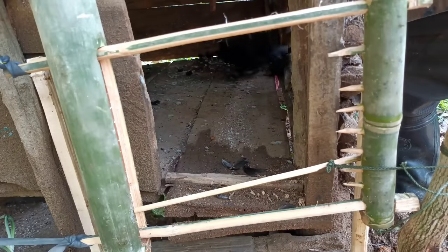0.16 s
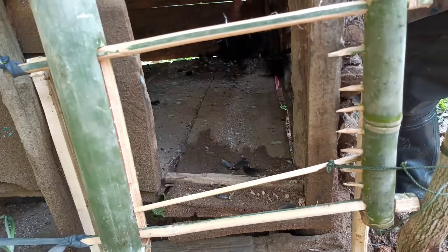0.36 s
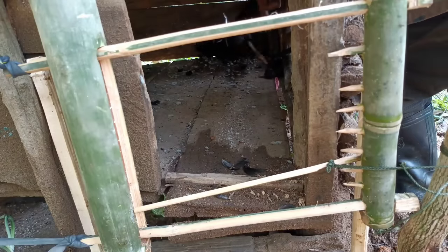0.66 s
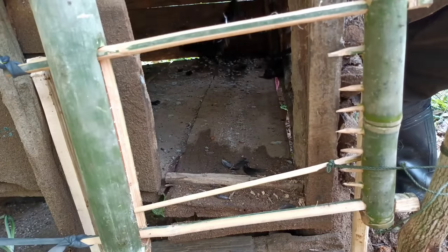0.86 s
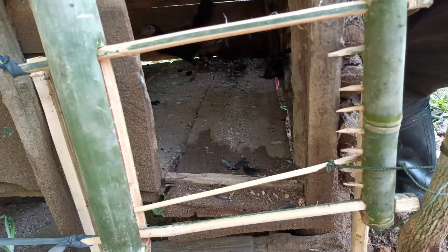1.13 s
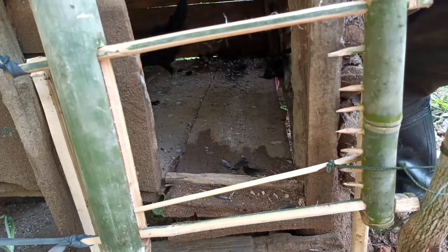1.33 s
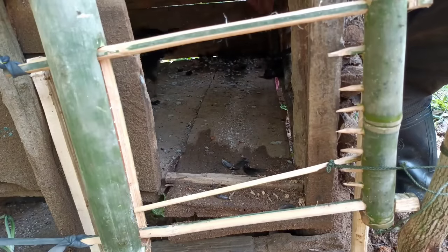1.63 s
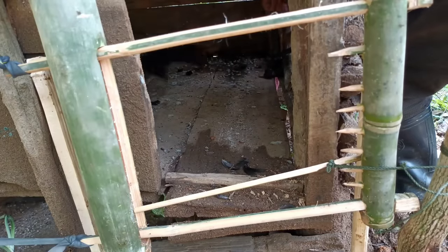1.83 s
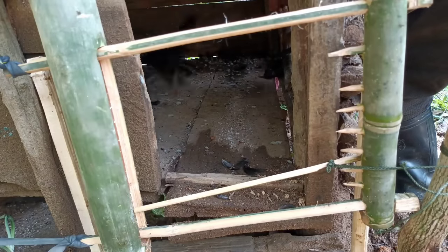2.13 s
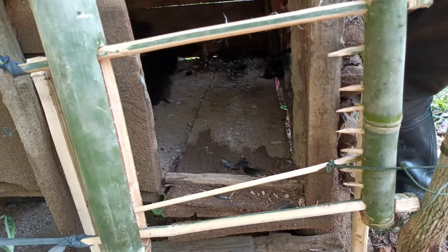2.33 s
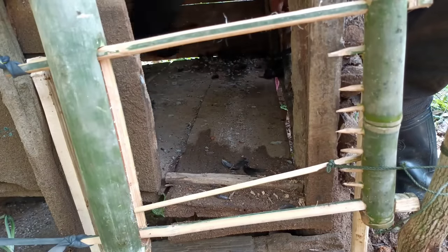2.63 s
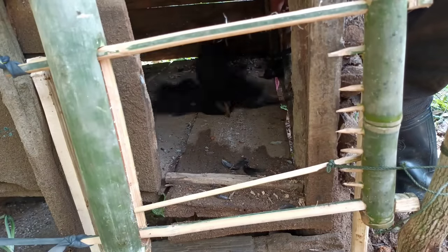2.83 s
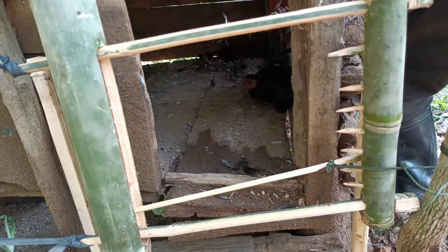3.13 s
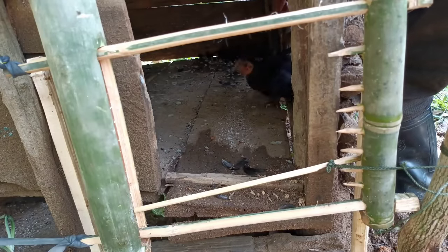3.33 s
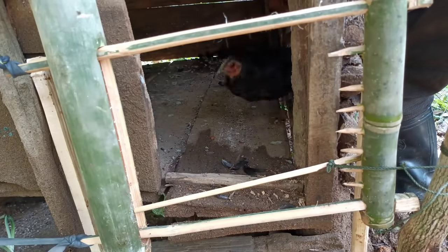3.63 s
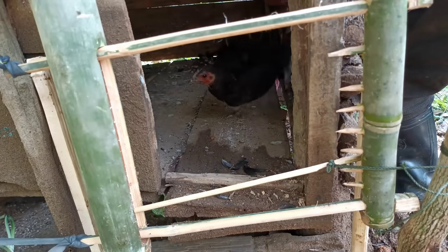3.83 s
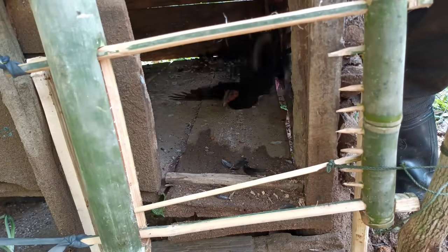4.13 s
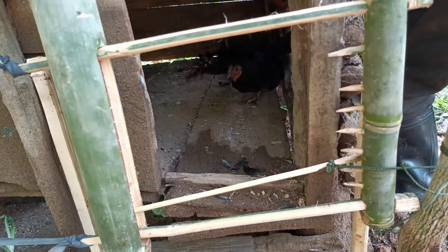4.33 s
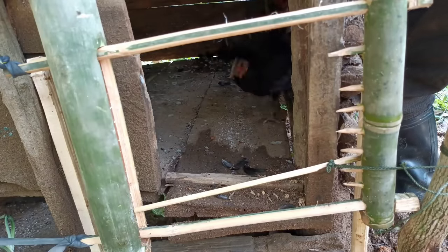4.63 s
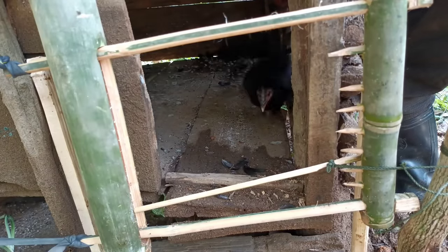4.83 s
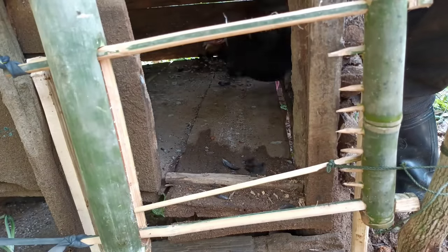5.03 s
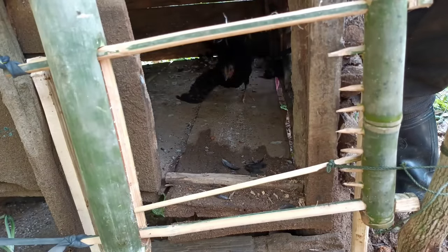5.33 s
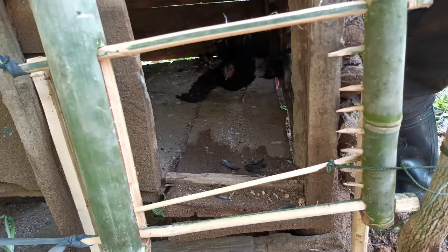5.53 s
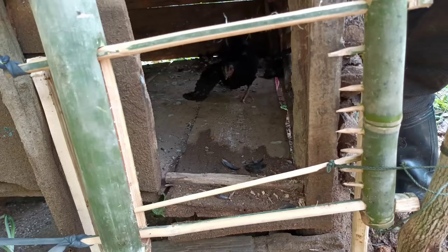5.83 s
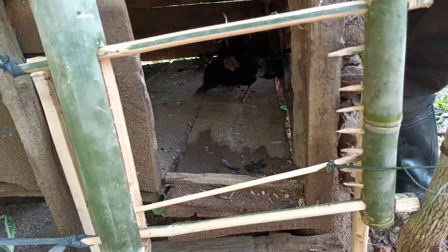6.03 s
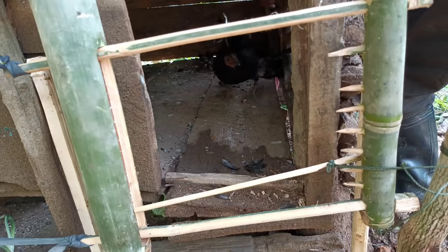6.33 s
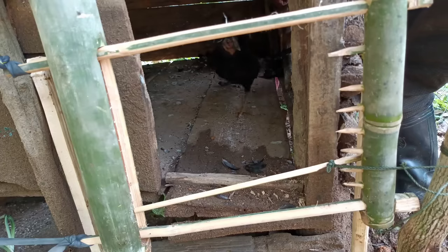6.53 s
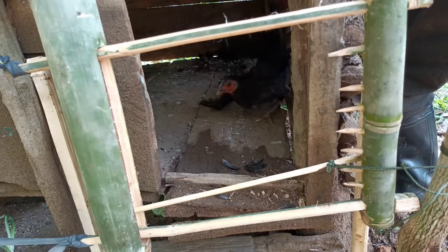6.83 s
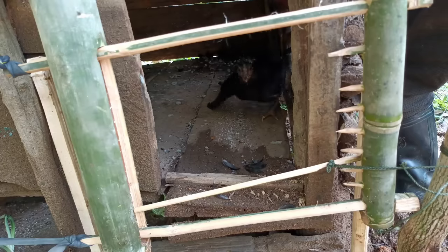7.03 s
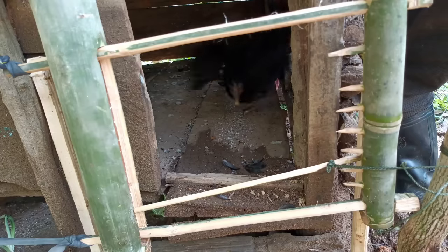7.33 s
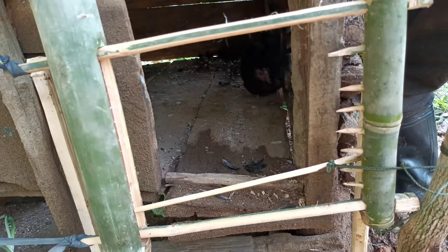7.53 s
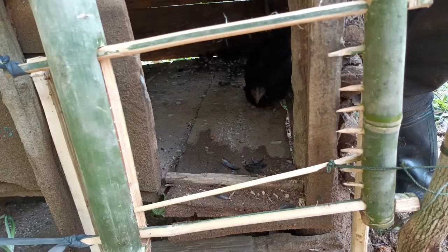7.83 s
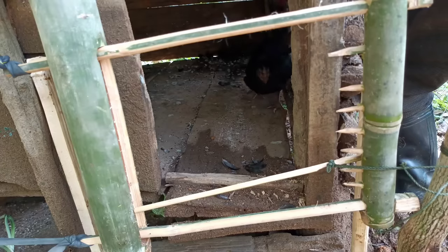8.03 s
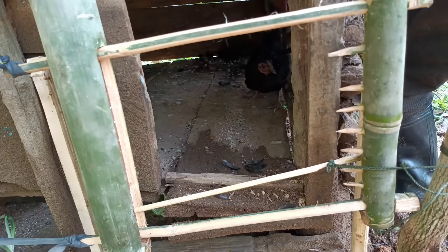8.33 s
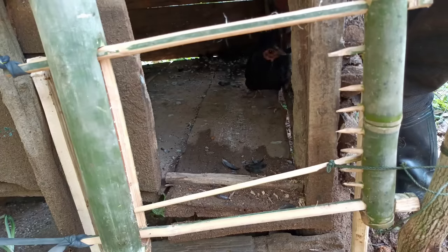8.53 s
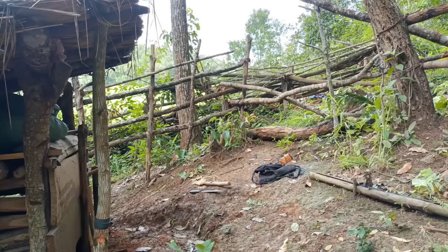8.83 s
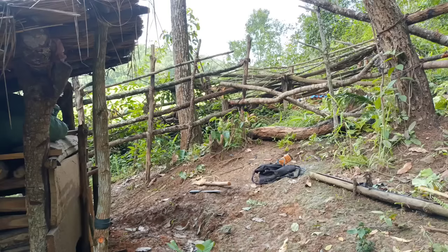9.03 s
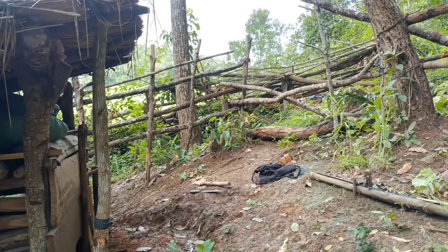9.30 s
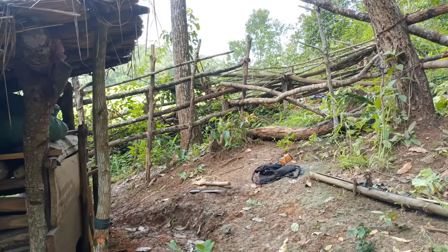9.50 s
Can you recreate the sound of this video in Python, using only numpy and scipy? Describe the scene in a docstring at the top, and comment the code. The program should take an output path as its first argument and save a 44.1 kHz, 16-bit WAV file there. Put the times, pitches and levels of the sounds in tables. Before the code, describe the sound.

Light footfalls on hollow boards come first, over soft low air and a faint insect hiss. A bird flaps, clucks, peeps and lands with a thump, then gives shrill two-toned squawks that swell, crack and collapse into hoarse rasps, some alone and two close together. After a quick fade and momentary silence, an open yard brings a thin, high insect drone and a dry wooden clack. The microphone is near the coop, in stereo.

```python
"""Shrill two-voiced squawks fall and break into a rasp, among peeps, low clucks, knocking feet and wings.
A young chicken is scrambling about a small plank coop; then the sound fades out and opens on a yard
where insects drone and a piece of wood clacks. The voice is a pair of whistles that collapse into pulses;
feet and wood are dying modes with bursts of noise; feathers, wings, air and insects are shaped noise."""
import sys
import numpy as np
from scipy import signal
from scipy.fft import rfft, irfft, next_fast_len
from scipy.io import wavfile
from scipy.ndimage import map_coordinates

SR = 44100
rng = np.random.default_rng(int(sys.argv[2]) if len(sys.argv) > 2 else 0)


def wav_record(signal):
    """Record a signal, one row per channel, as 16-bit PCM in the file named by sys.argv[1]."""
    frames = np.transpose(np.atleast_2d(signal))
    bounded = np.clip(frames, -1, 1)
    # unit amplitude maps onto the largest positive 16-bit level
    quanta = np.round(bounded * 32767).astype(np.int16)
    wavfile.write(sys.argv[1], SR, quanta)


N = 426006
T = np.arange(N) / SR

# Short peeps and chirps. Each row: start in seconds, length in seconds, mid pitch in Hz, glide in Hz per second,
# arch as a share of the pitch, peak level in dB before the voice trim, roughness 0-1.
PEEPS = [(0, 0.083, 4274, -3200, .02, -44.5, 0.42), (1.515, .068, 1850, 2000, 0.4, -54, 0),
         (2.291, 0.065, 3300, -7000, 0.024, -45.5, 0.18), (2.522, 0.061, 4025, -19000, 0.021, -36.5, 0.14),
         (2.688, .09, 4163, -4500, 0.055, -28.5, .06), (3.705, .048, 2593, 4, 0.099, -51.5, 0.65),
         (4.108, 0.034, 4054, 39995, .09, -30.5, 0.2), (6.566, 0.072, 4050, -15000, .22, -40.5, 0.24)]
PEEP_LEAN, PEEP_ENDS_DB, PEEP_SECOND = 0.56, -11, .1  # peaks early, soft at both ends, weak second voice
# Lines in the whistle. Each row: multiple of the first voice, multiple of the second, level in dB
# before the two voices' balance weighs it.
PARTIALS = [(2, 0, -9.5), (3, 0, -26.5), (1, 1, -25), (0, 2, -20), (0, 3, -31.5), (2, -1, -16.5),
            (3, -1, -21), (.5, 0, -24), (0, .5, -20.5)]
# The whistle's spectrum: thin near 6.4 kHz, strong around 7.7 and 9.1 kHz.
# Each row: frequency in Hz, relative level in dB.
WHISTLE_COLOUR = [(1800, -5), (2500, 6.5), (5200, 2), (6400, -12.5), (7700, 6.5), (8500, -4.5), (9100, 6),
                  (10200, 4)]
# The rasp's spectrum before the throat. Each row: frequency in Hz, relative level in dB.
RASP = [(250, -20.5), (480, -7), (800, -1), (1150, -6.5), (1700, -0.5), (4000, 0.5), (6500, -7),
        (8500, -8.5), (11000, -12), (15000, -27.5)]
# The far wash heard in the coop. Each row: frequency in Hz, relative level in dB per Hz.
COOP_AIR, COOP_AIR_DB = [(15, -31.5), (25, 1), (152, -6), (193, -7), (378, -13), (410, -10.5), (523, -13.5),
                         (895, -17), (2920, -17.5), (3830, -15), (5280, -22), (15500, -32)], -63.5
# Slow swell of the wash and drone in the coop. Each row: time in seconds, gain in dB.
AIR_SWELL = [(0, 3), (1.2, 2), (3.3, 2.5), (5.6, 0.5)]
# How alike the wash is left and right. Each row: frequency in Hz, likeness as a share (1 is identical).
SAME = [(30, 0.054), (130, 0.49), (600, 0.66), (1400, 0), (3000, 0)]
# Standing waves in the coop. Each row: frequency in Hz, width in Hz, level in dB.
HOLLOW = [(150, 35, -2.5), (817, 290, -9), (1679, 120, -11), (2720, 19, -20.5)]
# Decay of the coop's tail. Each row: frequency in Hz, time to fall 60 dB in seconds.
COOP_T60 = [(400, 0.23), (1500, 0.11), (12000, 0.27)]
# Feathers brushing the planks. Each row: middle in seconds, half length in seconds, peak level in dB.
BRUSHES = [(0.04, 0.24, -60), (1.74, 0.22, -67.5), (1.884, 0.01, -55), (1.957, 0.02, -45),
           (2.259, 0.014, -43), (2.53, 0.11, -54), (2.849, 0.017, -42), (3.02, 0.16, -57.5),
           (3.223, 0.006, -49), (4.319, 0.072, -54), (5.093, 0.0089, -37), (5.129, 0.015, -33.5),
           (7.833, 0.028, -53.5)]
# Colour of the brushing. Each row: frequency in Hz, relative level in dB.
FEATHERS = [(200, -7), (700, 0), (2000, 0), (4000, 1), (6000, -3), (8500, -2), (11000, -12), (15000, -12)]
# Spells of shuffling feet. Each row: middle in seconds, half length in seconds, peak level in dB.
SHUFFLES = [(.1, 0.19, -60), (0.723, 0.12, -61.5), (1.672, 0.13, -61.5), (2.66, 0.61, -56.5),
            (4.095, 0.14, -57.5), (5.043, 0.15, -53)]
# Modes of the boards. Each row: frequency in Hz, relative level in dB.
BOARDS = [(410, -8), (520, -7.5), (650, -3), (800, -8), (953, -2), (1150, -5.5), (1460, -15)]
# Feet on the boards. Each row: time in seconds, knock in dB and claw in dB, both before the mix of their parts.
STEPS = [(0.044, -34, -51), (0.086, -37.5, -62), (0.198, -39.5, -71), (0.684, -48, -68), (0.765, -42, -56),
         (0.828, -44.5, -61), (1.077, -37.5, -84), (1.361, -35, -50), (1.602, -40, -51.5),
         (1.945, -38, -38), (2.082, -36.5, -46), (2.246, -49, -37), (2.352, -34.5, -45),
         (2.426, -34.5, -30), (2.471, -33.5, -61), (2.509, -39.5, -51), (2.523, -27, -43),
         (2.762, -40, -30), (2.781, -38.5, -36.5), (2.944, -23.5, -27.5), (3.09, -37, -45),
         (3.246, -39.5, -51), (3.365, -45, -51), (3.632, -37.5, -59), (4.207, -36.5, -58),
         (4.698, -45, -56), (4.918, -40, -33.5), (5.025, -31.5, -20.5), (6.808, -43.5, -61),
         (7.42, -38, -51), (7.665, -51, -51), (7.898, -44, -61), (8.026, -56.5, -61)]
# The whole floor flexing. Each row: frequency in Hz, relative level in dB.
FLOOR = [(100, 0), (155, -5.5), (265, 3.5), (370, 3.5)]
LANDING_S, LANDING_DB = 2.946, -22  # the bird comes down with its whole weight
# Bouts of wingbeats. Each row: first beat in seconds, end in seconds, beats per second, peak level in dB.
FLURRIES = [(2.296, 3.0, 7.1, -52.5), (5.0, 5.15, 10.2, -47.5)]
# Colour of the wing gusts. Each row: frequency in Hz, relative level in dB.
PUSH = [(35, 5), (150, 0), (280, -5), (1000, -32.5), (4000, -82.5)]
# Low clucks. Each row: start in seconds, length in seconds, pitch in Hz, level in dB.
CLUCKS = [(2.384, 0.024, 437, -57), (2.607, 0.016, 469, -50), (2.685, 0.038, 474, -45),
          (2.772, 0.031, 506, -43), (2.874, 0.031, 405, -44.5), (5.06, 0.022, 503, -44),
          (5.178, 0.023, 477, -48.5)]
# Full squawks. Each row: start in seconds, whistle length in seconds, pitch in Hz, scoop as a share of the pitch,
# glide in Hz per second, drop time in seconds, opening level in dB and full level in dB before the voice trim,
# swell time in seconds, crack time in seconds after the start, second voice before the crack 0-1,
# second voice after it 0-1, roughness 0-1, rasp length in seconds, throat pitch of the rasp in Hz before it sags,
# rasp amount 0-1.
SQUAWKS = [(4.122, .134, 4737, .25, -1000, .033, -42.5, -22.5, 0.098, .076, .92, 0.04, .02, 0.027, 1850, 0.57),
           (4.88, 0.12, 4560, .25, 900, .009, -23, -18.5, 0.11, 0.061, 0, 0, 0.02, 0.059, 3056, 0.34),
           (5.152, .119, 4900, 0, -1, .017, -36, -21, 0.13, 0.035, .3, 0.25, .15, 0.057, 1849, 0.82),
           (6.772, 0.16, 4488, .1, -2000, .014, -48, -22, 0.12, .118, .33, 0.1, 0, 0.04, 1907, .85),
           (7.327, 0.2, 4058, .27, 3201.5, .035, -37.5, -21.5, 0.092, 0.083, .4, 0.54, 0.01, .055, 1920, 1)]
SCOOP_S = .011  # a squawk slides up to its pitch
SWELL_POWER = 1.3  # the swell starts slowly
CATCH, CATCH_S, CATCH_DB = .4, .005, -12  # the voice catches, hoarse and weak, as it starts
CRACK_S, CRACK_DIP, CRACK_DB, CRACK_ROUGH = .012, .045, -3, 1.3  # pitch and level dip, roughness rises
ROUGH_SOFT = .35  # share of its roughness that the voice has before it swells
DROP = .31  # share of the pitch lost by the time the whistle breaks
# the rasp sets in, sinks to its own pitch and dies
BREAK_S, SINK_S, RASP_FADE_DB, FADE_POWER = 0.003, .007, -19, 4.8
RASP_SAG = .18  # share by which the rasp's pitch sags as the beak closes
# The far wash heard in the yard. Each row: frequency in Hz, relative level in dB per Hz.
YARD_AIR, YARD_AIR_DB = [(15, -32), (25, 2.5), (148, -4), (313, -13.5), (349, -13), (1240, -20.5),
                         (3170, -16.5), (3530, -13.5), (4150, -16), (5730, -21), (6550, -20), (15500, -34)], -61.5
# The insect chorus. Each row: frequency in Hz, width in Hz of each of two resonances, level in dB.
INSECTS = [(3590, 41, -78.5), (4690, 360, -70), (5380, 490, -70.5), (5680, 15.4, -74), (6040, 28, -75)]
# One insect winding up. Each row: time in seconds, frequency in Hz, level in dB.
RISING_INSECT = [(8.78, 3160, -69.5), (8.911, 3543, -62), (9.05, 3630, -78.5)]
# Wood clacking in the yard. Each row: time in seconds, level in dB, tilt in dB an octave.
CLACKS = [(9.2119, -29.5, -2), (9.356, -48, -11.5)]
# Modes of that wood. Each row: frequency in Hz, relative level in dB.
WOOD = [(450, -3.5), (900, -2), (1320, 2), (1600, 2), (1900, 1), (2360, 11.5), (2950, 7.5), (3750, 4.5)]
EDGE_HZ = 15750  # nothing sounds above this


def amp(db):
    """Decibels to gain."""
    return 10 ** (np.asarray(db) / 20)


def unit(x):
    """Scales to rms 1."""
    return x / np.sqrt(np.mean(x ** 2) + 1e-20)


def read(points, hz):
    """Reads a spectrum on a log-frequency axis."""
    f, value = np.transpose(points)
    return np.interp(np.log(hz + 1), np.log(f + 1), value)


def add(mix, s, sound):
    """Mixes a sound in at time s."""
    part = mix[..., max(round(s * SR), 0):][..., :sound.shape[-1]]
    part += sound[..., :part.shape[-1]]


def colour(x, points):
    """Gives x a spectrum, at rms 1."""
    n = next_fast_len(x.shape[-1])
    gain = amp(read(points, np.fft.rfftfreq(n, 1 / SR)))
    return unit(irfft(rfft(x, n) * gain, n)[..., :x.shape[-1]])


def band(n, lo_hz, hi_hz):
    """Noise between two edges, at rms 1."""
    edges = [lo_hz, min(hi_hz, SR / 2 - 1)]
    sos = signal.butter(2, edges, "band", fs=SR, output="sos")
    return unit(signal.sosfilt(sos, rng.standard_normal(n)))


def wander(n, rate):
    """Smooth chance with about `rate` new values a second."""
    knots = rng.standard_normal(n)[:int(n * rate / SR) + 4]
    return map_coordinates(knots, [np.arange(n) * rate / SR], order=2, mode="nearest")


def bumps(rows):
    """Sums bell-shaped swells from rows of middle, half length and peak level."""
    return sum(amp(db) * np.exp(-((T - s) / half) ** 2) for s, half, db in rows)


def resonate(x, hz, width):
    """A resonance of gain 1 that can follow a curve."""
    turn = np.exp(2j * np.pi * np.cumsum(hz * np.ones(x.shape[-1])) / SR)
    r = np.exp(-np.pi * width / SR)
    return 2 * (turn * signal.lfilter([1 - r], [1, -r], x / turn)).real


def ring(modes, t, t60, spread, tilt_db=0):
    """Dying modes, the high ones faster; every blow lands on another spot and weighs them anew."""
    hz, db = np.transpose(modes)[:, :, None]
    detune, weight, phase = rng.standard_normal((3, len(modes), 1))
    decay_db = -60 * t / t60 * (hz / hz[0]) ** .25  # t60 belongs to the first mode
    level = amp(db + 2 * weight + tilt_db * np.log2(hz / hz[0]) + decay_db)
    tones = np.sin(2 * np.pi * (hz * (1 + spread * detune) * t + phase))
    return (level * tones).sum(0) / np.linalg.norm(level[:, 0])


def whistles(db, hz, second, rasp, unsteady, second_ratio=1.18, lurch=.06, jitter=0.011, rough_jitter=0.067,
             flutter_db=3.0, turbulence_db=-13, overtone_hiss_db=-13, clash_db=-22):
    """The two sides of the syrinx whistle and intermodulate, with hiss around them."""
    n = len(hz)
    pitch = hz * (1 + lurch * unsteady * wander(n, 138.75))
    shake = jitter + rough_jitter * rasp
    one, two = (2 * np.pi * np.cumsum(pitch * ratio * (1 + shake * wander(n, 900))) / SR
                for ratio in (1, second_ratio))
    first = np.sqrt(1 - second ** 2)
    whistle = first * np.sin(one) + second * np.sin(two)
    for j, k, line_db in PARTIALS:
        balance = (1 - second / 2) ** 2 * first ** min(j, 1) * (2 * second) ** min(abs(k), 1)
        whistle += amp(line_db) * balance * np.sin(j * one + k * two)
    whistle = colour(whistle, WHISTLE_COLOUR) * amp(flutter_db * (0.5 + 2 * unsteady) * wander(n, 250))
    whistle *= amp(7 * unsteady * wander(n, 130))
    # turbulence grows with the roughness and the second voice
    whistle += amp(turbulence_db) * unsteady * (1 + second) * band(n, 5700, 11000)
    octave_hiss = resonate(resonate(rng.standard_normal(n), 2 * hz, 2500), 2 * hz, 2500)
    whistle += amp(overtone_hiss_db) * octave_hiss
    whistle += amp(clash_db) * second * amp((db - db.max()) / 2) * band(n, 9500, 14000)
    return unit(whistle)


def rasping(hz, rasp_ratio=.34, pulse_jitter=.08, hiss=1.0, throat_width=1200, leak=0.13,
            shut_hz=1400, opening_hz=650, closed_db=1, closed_ratio=.8, closed_width=1600):
    """Slow uneven slaps of the membranes, each a click and a puff of air, ring the throat at hz."""
    n = len(hz)
    turns = np.cumsum(hz * rasp_ratio * (1 + pulse_jitter * wander(n, 700))) / SR
    slaps = np.diff(np.floor(turns), prepend=0) * amp(2 * wander(n, 500))
    puffs = np.exp(-(turns % 1) / 0.63) * rng.standard_normal(n)
    drive = colour(unit(slaps) + hiss * unit(puffs), RASP)
    # the closing beak lowers the throat's resonance and shuts the treble in
    opening = np.clip((hz - shut_hz) / opening_hz, 0, 1)
    harsh = resonate(drive, hz, throat_width) + leak * opening * drive
    closed = amp(closed_db) * resonate(harsh, hz * closed_ratio, closed_width)
    return unit(opening * harsh + (1 - opening) * closed)


def syrinx(db, hz, second, rasp, trade=0.49, edge_s=.003):
    """Two whistles give way to slow uneven pulses as the rasp grows."""
    n = len(hz)
    t = np.arange(n) / SR
    # the two sides trade strength by chance
    second = np.clip(second * (1 + trade * wander(n, 50)), 0, 1)
    rasp = np.clip(rasp, 0, 1)
    # near the break the pitch lurches and the level stutters
    unsteady = np.sqrt(np.minimum(rasp, .2))
    voice = (1 - rasp) * whistles(db, hz, second, rasp, unsteady) + np.sqrt(rasp) * rasping(hz)
    return amp(db) * voice * np.minimum(1, np.minimum(t, t[-1] - t) / edge_s)


def peep(s, length, mid_hz, glide, arch, db, rough):
    """A short arched note from the syrinx that stops before it breaks."""
    u = np.linspace(0, 1, round(length * SR))
    hz = (mid_hz + glide * length * (u - .5)) * (1 - arch * (2 * u - 1) ** 2)
    return s, syrinx(db + PEEP_ENDS_DB * (2 * u ** PEEP_LEAN - 1) ** 2, hz, PEEP_SECOND, rough)


def air(spectrum, db):
    """Far forest wash: shaped noise whose left-right likeness varies with frequency."""
    z = rfft(rng.standard_normal((2, N)), next_fast_len(N))
    same = np.clip(read(SAME, np.linspace(0, SR / 2, z.shape[1])), -1, 1)
    z[1] = same * z[0] + np.sqrt(1 - same ** 2) * z[1]
    return amp(db) * colour(irfft(z)[:, :N], spectrum)


def insect(hz, width, db, flutter_db=2):
    """Distant insects sing one fuzzy band, noise through two resonances, that swells and flutters."""
    song = resonate(resonate(rng.standard_normal((2, N)), hz, width), hz, width)
    return amp(db + flutter_db * wander(N, 25)) * unit(song)


def coop(x, wall_db, tail_db, apart_hz=1500, port_turn=1.69):
    """Close planks throw the sound back and the hollow rings; the two microphone ports agree best in the bass."""
    x = x + sum(amp(db) * resonate(x, hz, width) for hz, width, db in HOLLOW)
    n = SR // 2
    t, hz = np.arange(n) / SR, np.fft.rfftfreq(n, 1 / SR)
    # twenty scattered early reflections a side
    walls = np.zeros((2, n))
    places = (SR * rng.uniform(.001, .012, (2, 20))).astype(int)
    np.put_along_axis(walls, places, rng.choice([-1, 1], (2, 20)) / np.sqrt(20), 1)
    # a noise tail that dies at its own rate in each band
    f, age, z = signal.stft(rng.standard_normal((2, n)), SR, nperseg=256)
    decay = amp(-60 * age / read(COOP_T60, f)[:, None])
    tail = signal.istft(z * decay, SR, nperseg=256)[1][:, :n] * np.minimum(t / .008, 1)
    echo = rfft(amp(wall_db) * walls + amp(tail_db) * tail / np.linalg.norm(tail[0]))
    same = 1 / (1 + (hz / apart_hz) ** 2)
    echo[1] = same * echo[0] + np.sqrt(1 - same ** 2) * echo[1]
    # the direct sound differs in phase between the ports
    direct = np.exp(-1j * port_turn * np.tanh(hz / (2 * apart_hz)) * np.array([[0], [1]]))
    balance_db = read([(700, 1.0), (1300, -1.5), (2400, 0), (6000, -0.5), (8300, 8.5), (12000, -0.5)], hz)
    response = irfft((direct + echo) * amp(balance_db * np.array([[.5], [-.5]])), n)
    response = np.roll(response, 64, 1)  # keeps the filter's early side; the delay is cut off below
    return signal.oaconvolve(x[None], response, axes=1)[:, 64:N + 64]


def feathers(grain_db=4, clump_db=3):
    """Barbs scrape over rough wood in clumps."""
    grain = amp(grain_db * wander(N, 2500) + clump_db * wander(N, 130))
    return bumps(BRUSHES) * colour(rng.standard_normal(N) * grain, FEATHERS)


def shuffle(taps_per_s=110, uneven_db=4, board_width=70, scrape_db=-3):
    """Toes patter and drag lightly over the boards: chance taps on the board modes, and scraping noise."""
    taps = (rng.random(N) < taps_per_s / SR) * amp(uneven_db * rng.standard_normal(N))
    patter = unit(sum(amp(db) * resonate(taps, hz, board_width) for hz, db in BOARDS))
    return bumps(SHUFFLES) * unit(patter + amp(scrape_db) * band(N, 230, 650))


def footfall(t, db, claw, board_db=1, thump_db=-14, knock_db=-14, scrape_db=-3, claw_db=-3, dull_db=-7,
             claw_s=.007):
    """One contact thumps the floor, rings the boards and ticks with the claws."""
    n = len(t)
    wood = amp(board_db) * ring(BOARDS, t, t60=0.065, spread=0.044)
    wood += amp(dull_db) * band(n, 290, 1300) * np.exp(-t / 0.0063)
    wood += amp(thump_db) * ring(FLOOR, t, t60=0.11, spread=0.012)
    scrape = (amp(db + knock_db) + amp(claw + scrape_db)) * band(n, 1400, 3300) * np.exp(-t / 0.008)
    tick = amp(claw + claw_db) * band(n, 3500, 8900) * np.exp(-t / claw_s) * amp(2 * wander(n, 1500))
    return amp(db) * wood + scrape + tick


def steps(rise_s=0.0015, toes_db=-6, toes_s=0.011):
    """Each foot strikes the boards and its toes land a moment later; one landing flexes the whole floor."""
    out, t = np.zeros(N), np.arange(SR // 5) / SR
    rise = 1 - np.exp(-t / rise_s)
    for s, db, claw in STEPS:
        for delay, contact_db in ((0, 0), (toes_s * rng.uniform(.5, 1.5), toes_db)):
            add(out, s + delay - rise_s, amp(contact_db) * footfall(t, db, claw) * rise ** 2)
    add(out, LANDING_S, amp(LANDING_DB) * ring(FLOOR, t, t60=0.082, spread=0.0046) * rise)
    return out


def wings(half_s=0.033):
    """Low gusts of noise from the beating wings, at a steady rate in each flurry."""
    beats = [(s, half_s, db) for first, end, rate, db in FLURRIES for s in np.arange(first, end, 1 / rate)]
    return bumps(beats) * colour(rng.standard_normal(N), PUSH)


def clucks(fall=0.026, overtone_db=-14):
    """Short closed-beak notes, a tone and its octave, that sag in pitch."""
    out = np.zeros(N)
    for s, length, hz, db in CLUCKS:
        u = np.linspace(0, 1, round(length * SR))
        phase = 2 * np.pi * np.cumsum(hz * (1 + fall * (.5 - u) + 0.095 * wander(len(u), 300))) / SR
        tone = np.sin(phase) + amp(overtone_db) * np.sin(2 * phase)
        add(out, s, amp(db) * unit(np.sin(np.pi * u) * tone))
    return out


def squawk(s, whistle_s, top_hz, scoop, glide, drop_s, opening_db, full_db, swell_s, crack_s,
           before, later, rough, rasp_s, rasp_hz, rasp):
    """The pitch scoops up and glides as the effort swells; at the crack the two voices change balance;
    then the pitch drops ever faster until the whistle breaks into the rasp."""
    t = np.arange(0, whistle_s + rasp_s, 1 / SR)
    held, after = np.minimum(t, whistle_s), np.maximum(t - whistle_s, 0)
    effort = np.minimum(t / swell_s, 1) ** SWELL_POWER
    catch = np.exp(-t / CATCH_S)
    crack = np.exp(-((t - crack_s) / CRACK_S) ** 2)
    cracked = (1 + np.tanh((t - crack_s) / CRACK_S)) / 2
    broken = (1 + np.tanh((t - whistle_s) / BREAK_S)) / 2
    hz = (top_hz + glide * held) * (1 - scoop * np.exp(-t / SCOOP_S)) * (1 - CRACK_DIP * crack)
    hz *= 1 - DROP * np.exp((held - whistle_s) / drop_s)
    hz = rasp_hz + (hz - rasp_hz) * np.exp(-after / SINK_S)
    hz *= 1 - RASP_SAG * after / rasp_s
    db = opening_db + (full_db - opening_db) * effort + CATCH_DB * catch + CRACK_DB * crack
    db += RASP_FADE_DB * (after / rasp_s) ** FADE_POWER
    hoarse = rough * (ROUGH_SOFT + (1 - ROUGH_SOFT) * effort + CRACK_ROUGH * crack) + CATCH * catch
    second = before + (later - before) * cracked
    return s, syrinx(db, hz, second, hoarse + (rasp - hoarse) * broken)


def yard(crack_db=-3, crack_s=0.0049, echo_db=-17, echo_s=0.028):
    """The insect chorus, one singer winding up, and dry clacks of wood: modes, a noisy crack and a short echo."""
    s, hz, db = np.transpose(RISING_INSECT)
    out = air(YARD_AIR, YARD_AIR_DB) + sum(insect(*row) for row in INSECTS)
    out += insect(np.interp(T, s, hz), 40, np.interp(T, s, db))
    t = np.arange(SR // 5) / SR
    for s, db, tilt_db in CLACKS:
        body = ring(WOOD, t, t60=0.055, spread=0.0067, tilt_db=tilt_db)
        for port in out:
            crack = amp(crack_db + tilt_db) * band(len(t), 1360, 3600) * np.exp(-t / crack_s)
            echo = amp(echo_db) * band(len(t), 280, 3000) * np.exp(-t / echo_s)
            add(port, s, amp(db) * (body + crack + echo))
    return out


def scene(voice_db=-0.73):
    """The coop fades out; after a moment of silence the yard fades in."""
    voice = np.zeros(N)
    for row in PEEPS:
        add(voice, *peep(*row))
    for row in SQUAWKS:
        add(voice, *squawk(*row))
    body = feathers() + shuffle() + steps() + wings() + clucks()
    inside = coop(amp(voice_db) * voice, wall_db=-8.5, tail_db=-15.5)
    inside += coop(body, wall_db=-8, tail_db=-15.0)
    outdoors = air(COOP_AIR, COOP_AIR_DB) + insect(3800, 260, -77.5)
    inside += outdoors * amp(np.interp(T, *np.transpose(AIR_SWELL)))
    fade_out = np.interp(T, [8.63, 8.715], [1, 0]) ** 2
    fade_in = np.interp(T, [8.775, 8.825], [0, 1]) ** 2
    return inside * fade_out + yard() * fade_in


def record(dry):
    """A steep low-pass takes off the treble above the band edge."""
    low_pass = signal.firwin(511, EDGE_HZ, window=("kaiser", 9), fs=SR)
    return signal.oaconvolve(dry, low_pass[None], "same")


dry = scene()
out = record(dry)
wav_record(out)
```